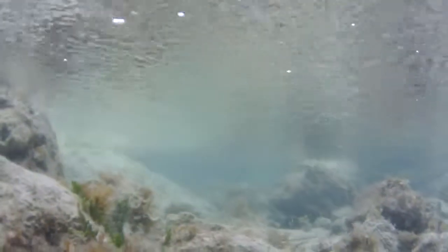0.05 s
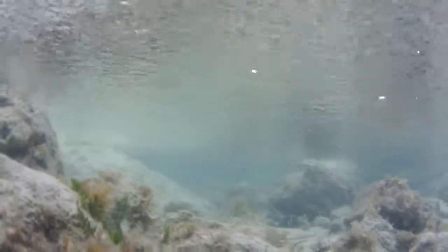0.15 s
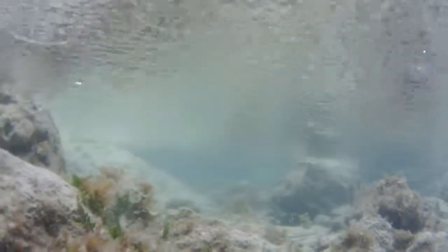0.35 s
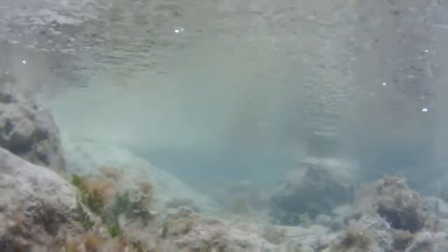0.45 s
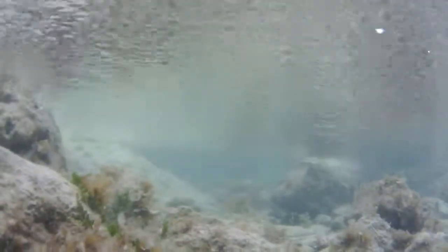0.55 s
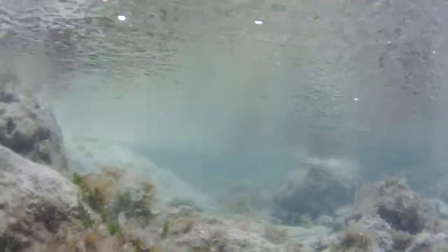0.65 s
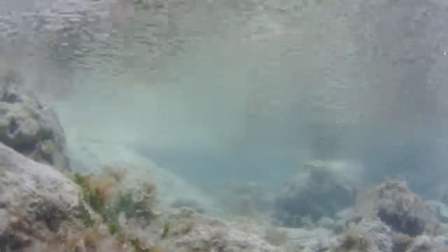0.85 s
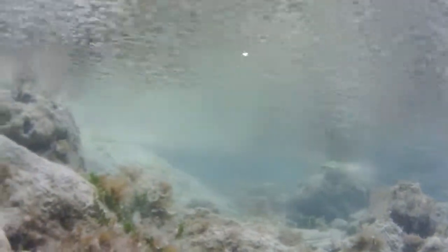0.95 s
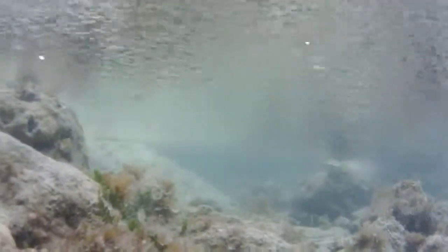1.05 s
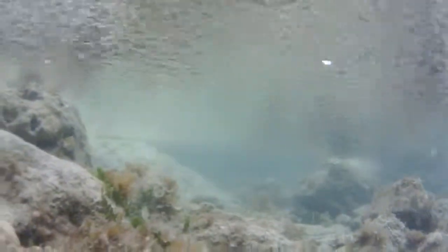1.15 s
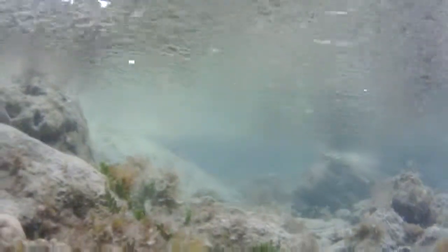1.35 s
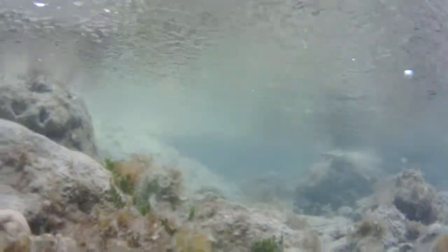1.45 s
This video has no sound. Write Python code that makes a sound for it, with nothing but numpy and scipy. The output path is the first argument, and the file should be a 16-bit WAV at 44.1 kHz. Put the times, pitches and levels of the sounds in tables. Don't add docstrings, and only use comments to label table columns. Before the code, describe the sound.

Irregular sharp ticks and soft knocks ring a sealed case in rumbling, surging shallow water

```python
import sys
import numpy as np
from scipy import signal
from scipy.fft import rfft, irfft
from scipy.io import wavfile
from scipy.ndimage import uniform_filter1d

SR = 44100
rng = np.random.default_rng(int(sys.argv[2]) if len(sys.argv) > 2 else 0)


def inscribe(sig):
    pcm = np.round(np.clip(np.atleast_2d(sig).T, -1, 1) * 32767)
    wavfile.write(sys.argv[1], SR, pcm.astype(np.int16))


def makeup_ratio(level_db):
    decades = np.asarray(level_db, float) / 20
    return 10 ** decades


N = 66150

# f/Hz, time to fall 60 dB/s
CASE_MODES = [(350, 0.067), (560, 0.071), (711, 0.092), (820, 0.047), (1078, 0.059), (1464, 0.023),
              (1810, 0.028), (2060, 0.036), (2375, 0.055), (2950, 0.036), (3068, 0.11), (3450, 0.1),
              (3900, 0.02), (4510, 0.093)]
# f/Hz, level/dB, time to fall 60 dB/s
SNAP_MODES = [(1620, -17.5, 0.0097), (1865, -3.5, 0.0081), (2734, -2.5, 0.0078), (3490, -23, 0.011)]
PORT_DRIVE = [-26.5, -26, -28.5, -37.5, -32, -6.5, -10.5, -16, 12, 8, -20, -19, -10, -23]
WALL_DRIVE = [-18, -13, 1, 9, 8, -12, 6, 6, -2.5, -13, -9.5, -12.5, -8, -11]
LID_DRIVE = [-15, -5, -20, -8, -3, -33, 0.5, -17, 6.5, 6.5, -29, -21, 0, -7]
EDGE_DRIVE = [-32, -24, -33.5, -28, -3, -19, -22, -2.5, -5.5, 7, -21, -17, -13, -12]
LATCH_DRIVE = [-25, -32, -17, 0.5, -5.5, -10, -5.5, -2.5, -6, 8, -25, -8, -15, -14]
# t/s, level/dB, tilt/dB per octave, ring time factor, crack level/dB
PORT_TICKS = [(.1072, -43, 2, 0.6, -11), (.1306, -44.5, 0, 0.82, -25), (.1516, -47.5, -14.5, 0.63, -13),
              (.178, -67, 6, .9, -8), (.4693, -54, 0, 0.9, -26), (.5167, -35, -13.5, 0.62, -23),
              (.5686, -47, 27.5, 0.83, -25), (.7222, -35, -5, 0.22, -17), (.7345, -40, -13, 0.4, -18),
              (.7791, -44.5, -5, 0.56, -19), (.8994, -56.5, -20, 1, -18), (1.1335, -37.5, 6, 0.69, -18.5),
              (1.2225, -42.5, 2, 0.63, -20), (1.3027, -42, -11.5, .7, -12.5), (1.3671, -52, -1, 0.62, -4.5)]
WALL_TICKS = [
    (1.1256, -24.5, 2.4, 0.66, -19),
    (1.2105, -47, 18, .4, 1),
    (1.2152, -37, 1, 0.57, -6),
]
LID_TICKS = [
    (.9458, -29.5, .3, 0.58, -13),
]
EDGE_TICKS = [
    (.4015, -47.5, .3, 0.62, -14),
    (.6925, -43.5, -1, 0.9, -19.5),
    (.8535, -38, .3, 0.68, -22),
    (1.2440, -45.5, 1, 0.39, -18.5),
]
LATCH_TICKS = [
    (1.003, -50.5, -2, 0.79, -15),
    (1.0194, -26, 1, 0.6, -19.5),
]
# f/Hz, level/dB
CRACK_COLOUR = [(1000, -18), (1500, -12), (4500, 6.5), (6000, -1.5), (7500, -20), (8800, 7.5),
                (10000, -3.5)]
# t/s, level/dB, contact time/s, ring f/Hz, ring level/dB
KNOCKS = [(0.1211, -33, 0.0005, 696, -9), (.173, -61, 0.00042, 546, -10), (0.208, -52, 0.00039, 537, -7),
          (0.2364, -45.5, 0.00022, 560, -2), (.359, -55.5, 0.00038, 423, 4.5),
          (.516, -43.5, 0.00098, 347, 1.5), (.519, -42.5, 0.00044, 450, -1.5),
          (0.7002, -37, 0.00037, 540, -14.5), (.732, -49.5, .0005, 790, 0.5),
          (.7675, -44, 0.00028, 464, -5), (0.854, -40, 0.00017, 367, -0.5),
          (1.099, -40, 0.00056, 464, -6.5), (1.1312, -34.5, 0.00022, 715, -15),
          (1.171, -47, 0.0003, 338, -0.5), (1.302, -41, 0.0003, 520, -4.5),
          (1.31, -42.5, 0.00019, 356, -2.5), (1.437, -57, 0.0013, 600, -4), (1.461, -41.5, 0.0018, 453, -8)]
# t/s, level/dB
SURGE = [(0, -45.5), (.07, -47), (.15, -42), (.21, -47.5), (.3, -43.5), (.39, -48), (.5, -43), (.55, -44),
         (.6, -44.5), (.67, -44.5), (.78, -45), (.88, -42.5), (.93, -43.5), (.98, -41.5), (1.06, -44),
         (1.2, -46.5), (1.3, -43.5), (1.4, -46)]
# f/Hz, level/dB
RUMBLE_COLOUR = [(15, -8), (25, -1.5), (33, 5), (42, 9), (55, 3), (70, -8), (100, -41.5)]
SLOSH_COLOUR = [(55, -27.5), (75, 1.5), (105, 2.5), (150, -9), (220, -11.5), (400, -32.5)]
GURGLE_COLOUR = [(150, 5), (250, -13), (400, 0.5), (750, -2), (950, -13.5), (1400, -29.5), (3000, -14.5),
                 (5000, -21.5)]
# f/Hz, level/dB
HISS_COLOUR = [(200, 17), (600, 1.5), (1200, 5.5), (2500, 4.5), (4000, -16.5), (6000, -10.5), (8000, -4),
               (10000, -1)]


def colour(x, table):
    hz, db = np.array(table).T
    f = np.maximum(np.arange(N // 2 + 1) * SR / N, 1)
    gain = makeup_ratio(np.interp(np.log(f), np.log(hz), db, left=-60))
    y = irfft(rfft(x) * gain, N)
    return y / np.std(y)


def walk(rate):
    k = int(SR / rate)
    steps = np.repeat(rng.standard_normal(N // k + 1), k)
    return 1.3 * uniform_filter1d(uniform_filter1d(steps, k), k)[:N]


def ring(x, hz, t60):
    pole = np.exp(2j * np.pi * hz / SR - np.log(1000) / (t60 * SR))
    return signal.lfilter([1], [1, -pole], x).imag


def fading(t, start, hz, t60):
    u = np.maximum(t - start, 0)
    return np.sin(2 * np.pi * hz * u) * 1000. ** (-u / t60)


def even(x):
    return x / np.sqrt(uniform_filter1d(x ** 2, int(.088 * SR)))


def hiss():
    level_db, flicker_db = -63, .8
    return makeup_ratio(level_db + flicker_db * walk(60)) * colour(rng.standard_normal(N), HISS_COLOUR)


def rumble_and_slosh(surge_db, swing_db):
    slosh_db, slosh_share = -52.5, .92
    rumble = makeup_ratio(surge_db) * even(colour(rng.standard_normal(N), RUMBLE_COLOUR))
    slosh = even(colour(rng.standard_normal(N), SLOSH_COLOUR))
    return rumble + makeup_ratio(slosh_db + slosh_share * swing_db) * slosh


def gurgle():
    per_s, spread_db, t60_s = 400, 3, .025
    bubbles = (rng.random(N) < per_s / SR) * makeup_ratio(spread_db * rng.standard_normal(N))
    strength = signal.lfilter([1], [1, -1000. ** (-1 / (t60_s * SR))], bubbles)
    return colour(strength * rng.standard_normal(N), GURGLE_COLOUR)


def case_hum():
    hum = np.zeros(N)
    for (hz, t60), db in zip(CASE_MODES, WALL_DRIVE):
        level = makeup_ratio(db / 2 + 3 * walk(19.5))
        hum += level * ring(rng.standard_normal(N), hz, t60)
    return hum / np.std(hum)


def case_drone():
    drone = ring(rng.standard_normal(N), 342, .2)
    return drone / np.std(drone)


def water(t):
    surge_db = np.interp(t, *np.array(SURGE).T)
    swing_db = surge_db - np.mean(surge_db)
    deep = rumble_and_slosh(surge_db, swing_db)
    small = makeup_ratio(-61.5) * gurgle() + makeup_ratio(-71) * case_hum() + makeup_ratio(-68) * case_drone()
    return deep + makeup_ratio(.1 * swing_db) * small


def shove(t):
    turn_s, in_s, out_s = .0021, .0087, .022
    sag_lag_s, sag_s = .049, .034
    u = t - .244
    body = np.tanh(u / turn_s) * np.exp(-np.abs(u) / np.where(u < 0, in_s, out_s))
    sag = np.exp(-((u - sag_lag_s) / sag_s) ** 2)
    soft = signal.butter(2, 184, fs=SR, output="sos")
    return signal.sosfiltfilt(soft, makeup_ratio(-12.5) * body - makeup_ratio(-29) * sag)


def knocks(t):
    out = np.zeros(N)
    for start, db, contact_s, hz, ring_db in KNOCKS:
        dent = -np.exp(-((t - start) / contact_s) ** 2)
        out += makeup_ratio(db) * (dent + makeup_ratio(ring_db) * fading(t, start, hz, .053))
    no_bass = signal.butter(2, 170, "high", fs=SR, output="sos")
    return signal.sosfilt(no_bass, out)


def ping(t):
    return makeup_ratio(-47) * fading(t, .9465, 3068, .14)


def chatter():
    level_db, t60_s, per_s = -2, .02, 1500
    t = np.arange(512) / SR
    bounces = (rng.random(512) < per_s / SR) * rng.standard_normal(512)
    hits = bounces * makeup_ratio(level_db) * 1000. ** (-t / t60_s)
    hits[0] = 1
    return hits / np.sqrt(np.sum(hits ** 2))


def ticks(table, drive_db, snap_db):
    trim_db, scatter_db, rise_s, crack_t60_s = -1, 1.5, .0002, .02
    length = 8192
    out = np.zeros(N + length)
    hz, t60 = np.array(CASE_MODES).T[:, :, None]
    drive = makeup_ratio(drive_db)[:, None]
    drive = drive / np.sqrt(np.sum(drive ** 2))
    grit = colour(rng.standard_normal(N), CRACK_COLOUR)
    for start, db, tilt_db, hold, crack_db in table:
        i = int(start * SR)
        t = np.maximum((np.arange(length) + i) / SR - start, 0)
        gain_db = tilt_db * np.log2(hz / 2400) + scatter_db * rng.standard_normal(hz.shape)
        tones = np.sin(2 * np.pi * hz * t) * 1000. ** (-t / (t60 * hold))
        modes = np.sum(drive * makeup_ratio(gain_db) * tones, axis=0)
        snap = np.zeros(length)
        for f, mode_db, mode_t60 in SNAP_MODES:
            level = makeup_ratio(snap_db + mode_db + tilt_db * np.log2(f / 2400))
            snap += level * fading(t, 0, f, mode_t60)
        snap = np.convolve(snap, chatter())[:length]
        crack = makeup_ratio(crack_db) * np.roll(grit, -i)[:length] * 1000. ** (-t / crack_t60_s)
        onset = 1 - np.exp(-t / rise_s)
        out[i:i + length] += makeup_ratio(db + trim_db) * (modes + snap + crack) * onset
    return out[:N]


def all_ticks():
    return (ticks(PORT_TICKS, PORT_DRIVE, -4) + ticks(WALL_TICKS, WALL_DRIVE, 0)
            + ticks(LID_TICKS, LID_DRIVE, -3) + ticks(EDGE_TICKS, EDGE_DRIVE, -4)
            + ticks(LATCH_TICKS, LATCH_DRIVE, -3))


def scene():
    t = np.arange(N) / SR
    hard = all_ticks() + ping(t)
    return (hard + knocks(t) + shove(t) + water(t))[None]


def top_cut(x):
    return signal.sosfilt(signal.butter(12, 9650, fs=SR, output="sos"), x)


def record(dry):
    x = dry + hiss()
    f = np.arange(N // 2 + 1) * SR / N
    outside_gap = (f < 7700) | (f > 8130)
    x = irfft(rfft(x) * (f < 9680) * outside_gap, N)
    return top_cut(x)


dry = scene()
out = record(dry)
inscribe(out)
```